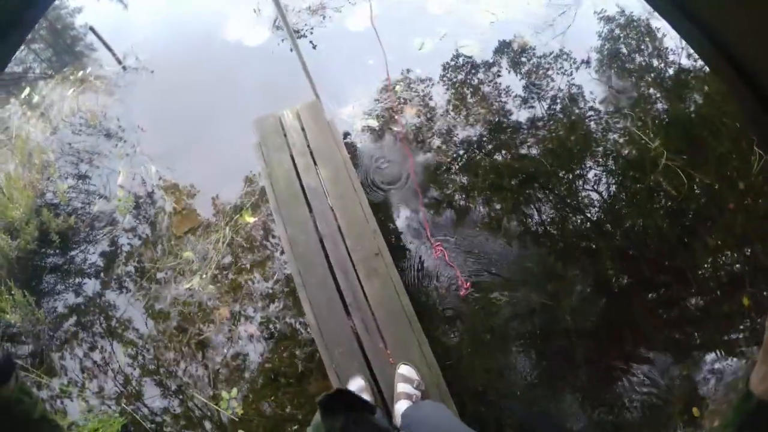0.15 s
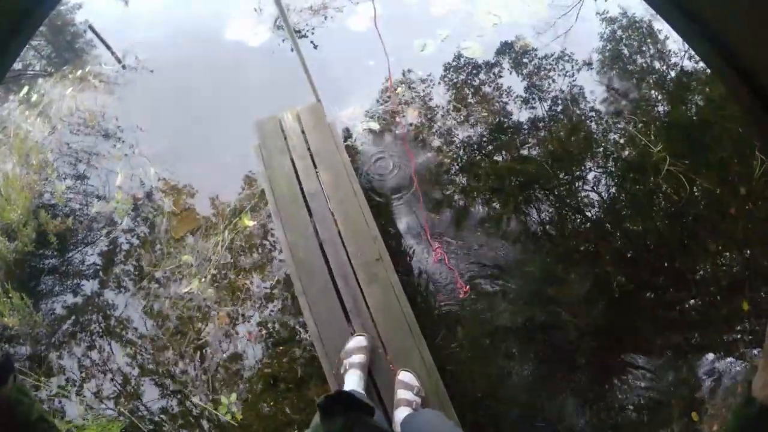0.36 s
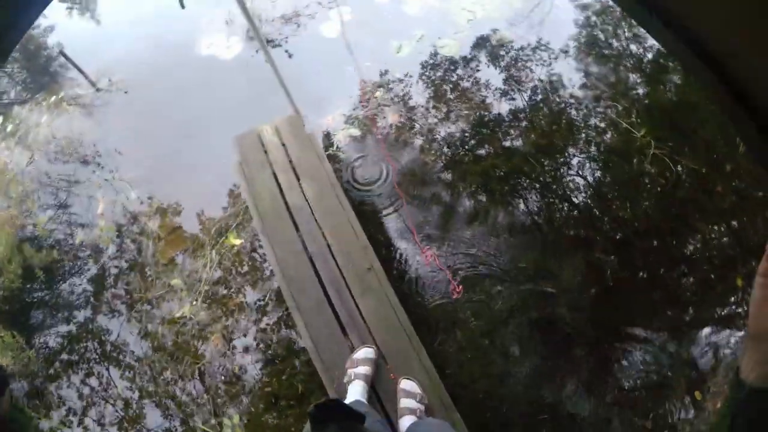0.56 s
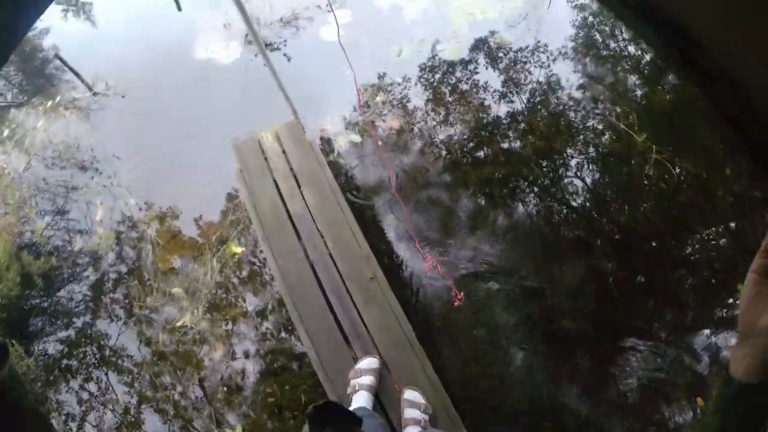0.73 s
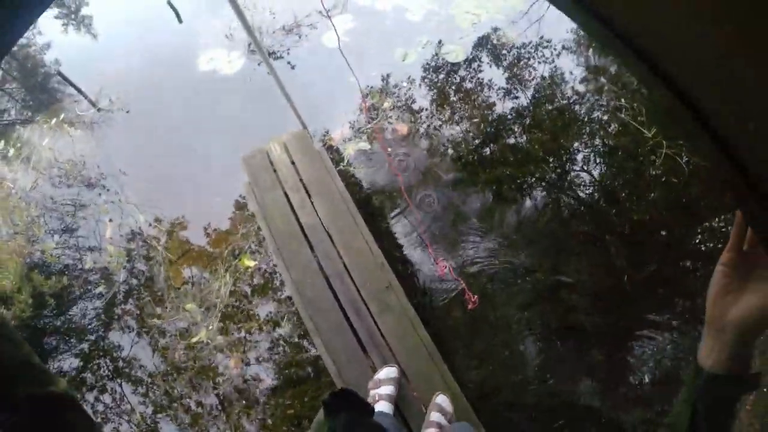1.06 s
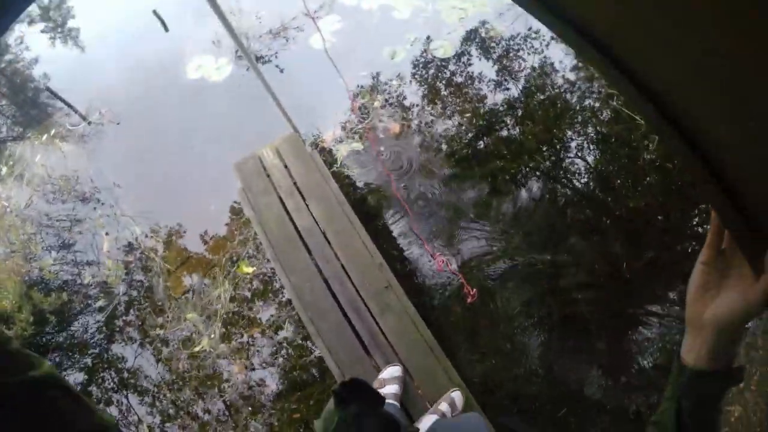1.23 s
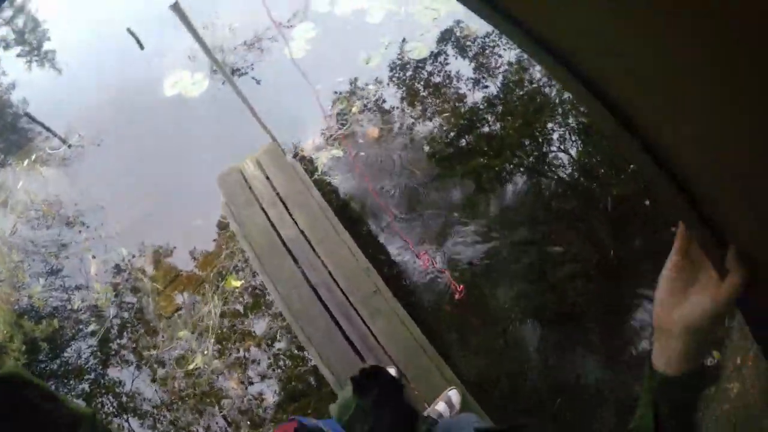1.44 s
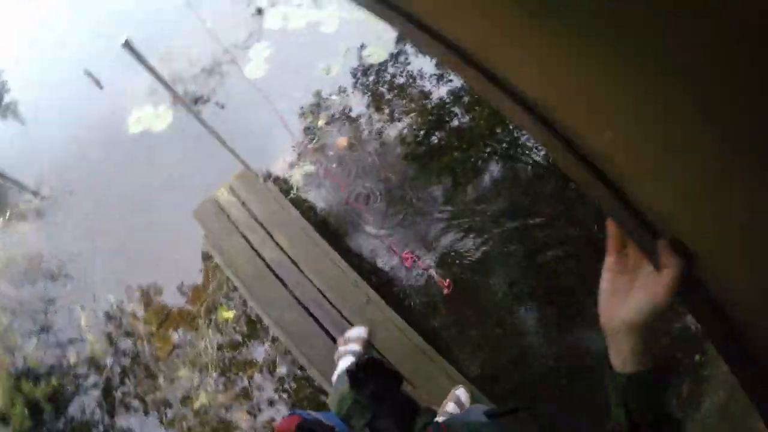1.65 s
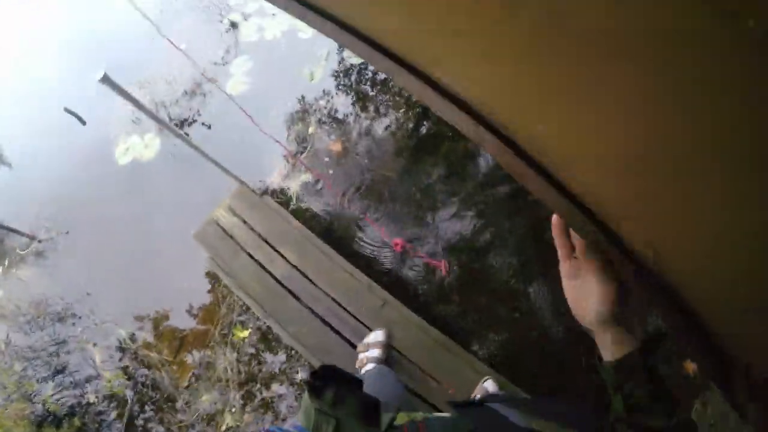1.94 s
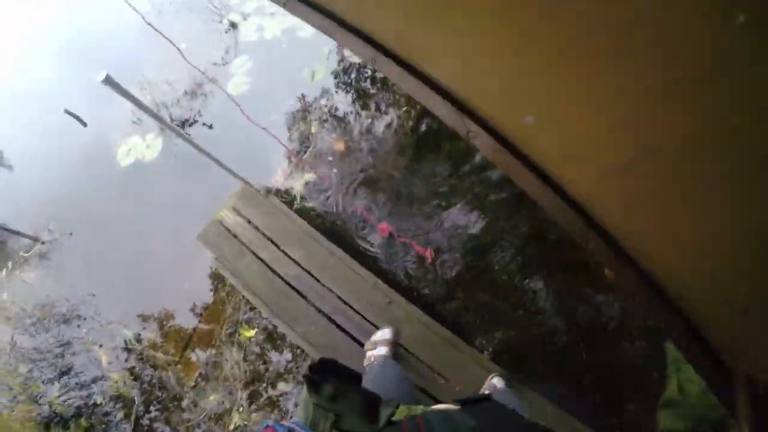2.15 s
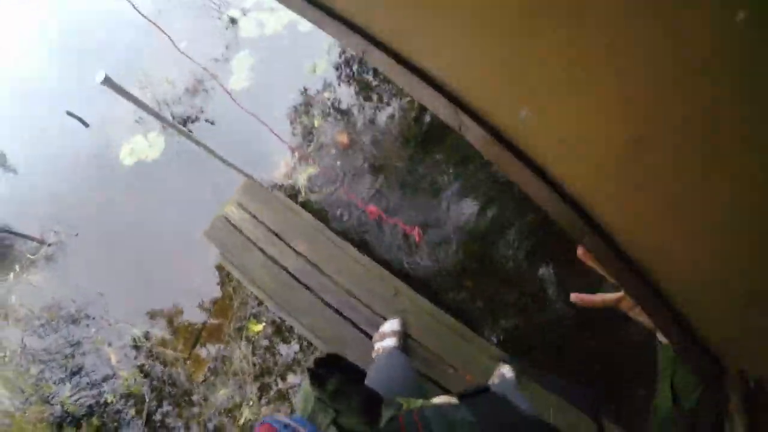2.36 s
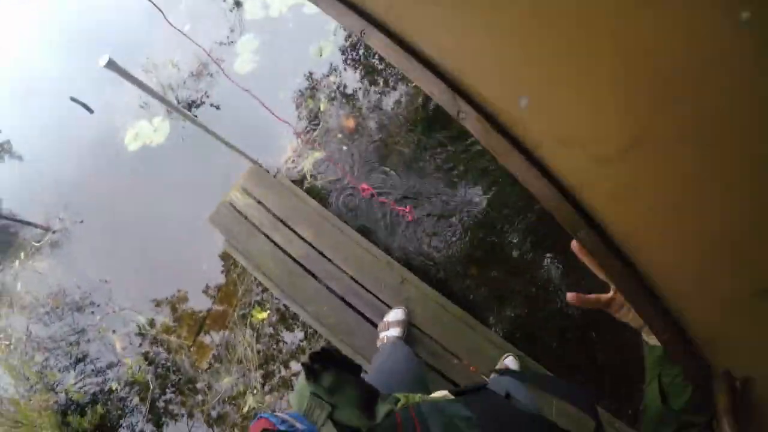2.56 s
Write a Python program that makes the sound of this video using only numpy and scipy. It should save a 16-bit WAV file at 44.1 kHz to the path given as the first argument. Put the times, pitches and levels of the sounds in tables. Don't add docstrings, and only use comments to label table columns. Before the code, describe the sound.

A boat hull booms and knocks as it is shifted, with small creaks and heavy low rumble

```python
import sys
import numpy as np
from scipy import signal
from scipy.fft import rfft, irfft
from scipy.io import wavfile
from scipy.ndimage import uniform_filter1d

SR = 44100
rng = np.random.default_rng(int(sys.argv[2]) if len(sys.argv) > 2 else 0)


def transcribe(u):
    v = np.clip(np.atleast_2d(u).T, -1, 1)
    q = np.round(v * 32767).astype(np.int16)
    wavfile.write(sys.argv[1], SR, q)


def gain_from_db(level_db):
    decades = np.asarray(level_db, float) / 20
    return 10 ** decades


N = 119070
T = np.arange(N) / SR
HZ = np.fft.rfftfreq(N, 1 / SR)

# (time [s], level [dB])
SHAKE_LEVEL = [(0, -32.5), (.17, -23), (.3, -31), (.5, -19.5), (.6, -25.5), (.85, -23), (1.15, -24.5),
               (1.45, -19.5), (1.54, -29), (1.6, -15.5), (1.72, -16), (1.88, -14), (1.98, -25), (2.13, -15),
               (2.28, -23), (2.4, -25.5), (2.52, -15.5), (2.65, -29)]
# (time [s], level [dB])
LOAD_LEVEL = [(0, -35), (.3, -45), (.55, -40), (.7, -28.5), (1.1, -26.5), (1.2, -31), (1.35, -23),
              (1.52, -24.5), (1.56, -31), (1.9, -36), (2.08, -21), (2.2, -31), (2.245, -27), (2.33, -16),
              (2.39, -31.5), (2.47, -26.5), (2.58, -41.5), (2.67, -37.5)]
# (frequency [Hz], level [dB], t60 [s])
HULL_MODES = [(79.35, -13, 0.68), (105.9, 0.5, 0.3), (127.1, -4.5, 0.49), (163, -3, 0.23),
              (184.6, -3.5, 0.2), (210, -8, 0.098), (235.5, -5.5, 0.14), (261, -10.5, 0.15),
              (308.6, -15, 0.2), (393, -14, 0.13), (453.3, -26.5, 0.099), (520, -30, 0.33),
              (639, -28.5, 0.2), (697, -33, 0.078), (780, -40, 0.07)]
# (frequency [Hz], density [dB per Hz])
AIR_SPECTRUM = [(60, -6), (200, -15), (500, -17.5), (900, -16), (2000, -28), (5000, -38), (7000, -86),
                (14800, -39)]
# (time [s], level [dB])
RUSTLE_LEVEL = [(0, -59), (.1, -60.5), (.4, -59), (.65, -54.5), (1.1, -56), (1.25, -54), (1.4, -53),
                (1.6, -48.5), (1.8, -52), (1.9, -50.5), (2.07, -47), (2.2, -51), (2.4, -54), (2.55, -58),
                (2.7, -56.5)]
# (frequency [Hz], density [dB per Hz])
CLOTH_SPECTRUM = [(300, -2.5), (1000, -4), (2500, -9), (5000, -13.5), (6600, -5), (8500, -9.5),
                  (11000, -15), (14800, -21)]
# (time [s], length [s], level [dB], brightness [dB per octave])
CLOTH_SCUFFS = [(.008, 0.065, -60, 7), (0.466, 0.017, -45, -3), (0.714, .16, -42, -10),
                (1.042, 0.02, -29, -8), (1.271, 0.046, -41, -1), (1.291, 0.027, -32.5, -3.5),
                (1.413, 0.0048, -46, -1), (1.449, 0.025, -43.5, 2.5), (1.672, 0.023, -46.5, 1),
                (2.027, 0.07, -36.5, -6.5), (2.246, 0.042, -40.5, -0.5), (2.324, 0.032, -46, 4),
                (2.641, 0.023, -42.5, 1.9)]
# (time [s], level [dB], centre [Hz])
CLOTH_SNAPS = [(.0075, -30.5, 6850), (0.0133, -44, 6700), (0.0186, -27, 6960), (.0225, -43, 6500),
               (.032, -35, 7950), (.063, -42, 4970), (0.1632, -44, 8200), (0.252, -47, 6960),
               (.2892, -40, 7400), (0.8103, -31.5, 6850), (1.413, -31, 6900)]
# (time [s], level [dB], brightness [dB per octave])
HULL_BLOWS = [(.036, -23.5, -20), (.44, -23.5, 9), (0.678, -31, -10), (1.043, -12, -4), (1.066, -21, -3),
              (1.3, -17, -4), (1.68, -15.5, 7), (1.931, -24, 8), (1.974, -22, -4), (2.01, -24, 9),
              (2.065, -11, 8), (2.085, -24, -0.5), (2.131, -32, 10), (2.247, -8.5, 11.5), (2.254, -1, 4),
              (2.266, 2, 0.3), (2.293, -3.5, 1.5), (2.324, -14.5, 6), (2.339, -5.5, 1.5),
              (2.352, -11.5, -2.5), (2.414, -15, -11), (2.49, -28, 12.5)]
# (time [s], tick level [dB], ring re tick [dB], sizzle re tick [dB])
YOKE_SLIPS = [(.436, -31.5, -14, 3.5), (0.467, -29.5, -4.5, 1.5), (.669, -35, 4, -23),
              (.723, -30.5, 1.5, -8), (.761, -31, 4, -6), (0.793, -32.5, 5.5, -5), (.819, -32.5, 6.5, -15),
              (0.836, -35, 5, -5), (0.857, -31, 5, -16), (.887, -36.5, 9.5, -14), (.932, -45, 3, -13),
              (0.991, -38, 6.5, -5), (1.0407, -19, -13, -6.5), (1.046, -34, -7, -27),
              (1.052, -29.5, -3, -14), (1.0615, -35, -7, -20), (1.071, -36, -14, -22),
              (1.277, -34.5, -0.5, -15), (1.297, -28, -5.5, -22), (1.316, -40, -4, -12),
              (1.346, -33.5, 2, -20), (1.684, -35.5, -1.5, -4), (1.899, -34, -5.5, -25),
              (1.977, -34.5, -5, -19), (2.0, -32, -5, -8), (2.2475, -42, 10.5, -10), (2.2636, -30.5, -3, 2),
              (2.362, -35, -6.5, -20), (2.647, -39.5, -11, -3)]
# (frequency [Hz], level [dB], t60 [s])
TICK_MODES = [(874, -1, 0.019), (1260, 5, 0.014), (1420, -3, 0.018), (1663, 4, 0.014), (2020, -3, 0.0073),
              (2340, -1.5, 0.013), (2770, -8, 0.013), (3510, -11.5, 0.018), (4350, -14, 0.0069)]
# (frequency [Hz], level [dB], t60 [s])
YOKE_MODES = [(455.4, 1.5, 0.067), (536.5, -4, 0.055), (615, -3.5, 0.065), (696.5, -11, 0.066),
              (763, -6, 0.051), (883, -8, 0.09), (981, -10, 0.056), (1167, -11.5, 0.031)]
# (time [s], level [dB])
HUM_LEVEL = [
    (.6, -83),
    (.76, -36.5),
    (.9, -23.5),
    (1.11, -34),
    (1.18, -43),
    (1.36, -44),
    (1.5, -33),
    (1.56, -48),
]
# (time [s], level [dB], pitch [Hz])
GROAN_TRACK = [
    (1.2, -51.5, 460),
    (1.29, -38, 433),
    (1.36, -37.5, 478.4),
    (1.391, -47, 475.2),
    (1.41, -37.5, 446),
    (1.47, -39, 449),
    (1.53, -42.5, 459),
    (1.55, -53, 463),
    (1.6, -38, 470),
]
# (time [s], length [s], level [dB], pitch [Hz])
PANEL_PINGS = [
    (1.298, 0.038, -29, 564),
    (1.563, 0.049, -30, 249.6),
    (2.006, 0.026, -37.5, 750),
]
# (frequency [Hz], left over right [dB])
PORT_BALANCE = [(70, 3), (200, 1.5), (600, 1.5), (1400, -3), (3000, -2.7), (5500, 4.5), (9000, -5),
                (14000, 0)]
# (frequency [Hz], left lead [rad])
PORT_PHASE = [(120, -0.2), (330, -.45), (780, -2), (1380, -1.82), (1890, -1.2), (4050, -0.34), (7670, -4),
              (12000, -3.5)]
# (frequency [Hz], left-right correlation [0..1])
PORT_LIKENESS = [(150, 0.98), (350, 0.83), (600, 0.61), (2000, 0.57), (8000, 0.27)]


def evened(x):
    return x / np.sqrt(np.mean(x ** 2) + 1e-20)


def smoothed(x, samples):
    return uniform_filter1d(uniform_filter1d(x, samples), samples)


def read(points, hz):
    f, value = np.transpose(points)
    return np.interp(np.log(hz + 1), np.log(f + 1), value)


def level(curve):
    s, db = np.transpose(curve)
    return gain_from_db(np.interp(T, s, db))


def add(mix, s, sound):
    part = mix[max(round(s * SR), 0):][:len(sound)]
    part += sound[:len(part)]


def flicker(per_s, db):
    return gain_from_db(db * evened(smoothed(rng.standard_normal(N), int(SR / per_s))))


def tone(hz):
    return np.sqrt(2) * np.sin(2 * np.pi * np.cumsum(hz) / SR)


def coloured(spectrum_db, x):
    return evened(irfft(rfft(x) * gain_from_db(spectrum_db), N))


def resonate(x, hz, width_hz):
    r = np.exp(-np.pi * width_hz / SR)
    pole = r * np.exp(2j * np.pi * hz / SR)
    return 2 * signal.lfilter([1 - r], [1, -pole], x, axis=-1).real


def body(modes, detune=0, bright_db=0):
    t = T[:SR // 3]
    ring = np.zeros(len(t))
    for hz, db, t60 in modes:
        decay = gain_from_db(db + bright_db * np.log2(hz / 200) - 60 * t / t60)
        mode_hz = hz * (1 + detune * rng.standard_normal())
        ring += decay * np.sin(2 * np.pi * mode_hz * t)
    return ring / abs(ring).max()


def bloom(modes, rise_s, spread):
    t = T[:SR // 6]
    ring = np.zeros(len(t))
    for hz, db, t60 in modes:
        level_draw, pitch_draw, phase_draw = rng.standard_normal(3)
        decay = gain_from_db(db + 2.04 * level_draw - 60 * np.maximum(t - rise_s, 0) / t60)
        ring += decay * np.sin(2 * np.pi * hz * (1 + spread * pitch_draw) * t + 9 * phase_draw)
    ring *= 1 - np.exp(-(t / rise_s) ** 3 * 1.7)
    return ring / abs(ring).max()


def shake():
    centre_hz, width_hz, pan_db, same = 31.2, 41, -13.5, 0.81
    lumps = resonate(rng.standard_normal((2, N)), centre_hz, width_hz)
    lumps = resonate(lumps, centre_hz, width_hz * 2.65)
    lumps = lumps / smoothed(abs(lumps), SR // 14)
    a, b = irfft(rfft(lumps) / (1 + (HZ / 50) ** 6), N)
    left = same * a + np.sqrt(1 - same ** 2) * b
    pair = np.array([left * gain_from_db(pan_db / 2), a * gain_from_db(-pan_db / 2)])
    return pair / np.sqrt(np.mean(pair.mean(axis=0) ** 2)) * level(SHAKE_LEVEL)


def hull_rub():
    friction = rng.standard_normal(N) * flicker(35.5, 4.1)
    rub = signal.oaconvolve(friction, body(HULL_MODES, bright_db=-10))[:N]
    rub = rub / smoothed(abs(rub), SR // 20)
    return evened(rub) * level(LOAD_LEVEL)


def air():
    hiss = rng.standard_normal(N) * flicker(36, 1)
    return gain_from_db(-46) * coloured(read(AIR_SPECTRUM, HZ), hiss)


def jacket():
    grains_per_s, spread_db, grain_db, grain_s = 900, 5, -5, 0.00091
    size = gain_from_db(spread_db * np.minimum(rng.exponential(1, N), 3.5))
    grains = size * (rng.random(N) < grains_per_s / SR)
    grains = np.convolve(grains, np.exp(-T[:200] / grain_s))[:N] * rng.standard_normal(N)
    raw = rng.standard_normal(N) + gain_from_db(grain_db) * evened(grains)
    cloth_db = read(CLOTH_SPECTRUM, HZ)
    out = gain_from_db(7) * coloured(cloth_db, raw * flicker(35, 1.5)) * level(RUSTLE_LEVEL)
    octaves = np.log2(np.clip(HZ, 500, 8000) / 3000)
    for s, length_s, db, bright_db in CLOTH_SCUFFS:
        scuff = coloured(cloth_db + bright_db * octaves, raw)
        u = (T - s) / length_s
        out += gain_from_db(db) * scuff * np.clip(u / 0.038, 0, 1) * np.exp(-np.maximum(u, 0) ** 3.4)
    return out


def cloth_snaps():
    decay_s, width_hz = 0.0015, 2200
    out, t = np.zeros(N), T[:400]
    for s, db, hz in CLOTH_SNAPS:
        burst = rng.standard_normal(len(t)) * np.exp(-t / decay_s)
        crack = resonate(resonate(burst, hz, width_hz), hz, width_hz)
        add(out, s, gain_from_db(db + 3) * crack / abs(crack).max())
    return out


def hull_blows():
    rise_s = 0.0014
    out = np.zeros(N)
    for s, db, bright_db in HULL_BLOWS:
        ring = body(HULL_MODES, 0.0347, bright_db)
        add(out, s, gain_from_db(db) * ring * (1 - np.exp(-T[:len(ring)] / rise_s)))
    return out


def yoke_slips():
    tick_rise_s, ring_rise_s, sizzle_decay_s = 0.001, 0.0095, 0.0012
    out, t = np.zeros(N), T[:1500]
    for s, tick_db, ring_db, sizzle_db in YOKE_SLIPS:
        tick = bloom(TICK_MODES, tick_rise_s, 0.035)[:len(t)]
        sizzle = resonate(resonate(rng.standard_normal(len(t)), 7700, 2600), 7800, 2800)
        sizzle *= np.exp(-t / sizzle_decay_s)
        sizzle /= abs(sizzle).max()
        ring = bloom(YOKE_MODES, ring_rise_s, 0.011)
        add(out, s, gain_from_db(tick_db + 3) * (tick + gain_from_db(sizzle_db - 3) * sizzle))
        add(out, s, gain_from_db(tick_db + ring_db + 5) * ring)
    return out


def hull_hum():
    hum_hz, waver = 103.47, 0.0354
    pitch_hz = hum_hz * flicker(25, 1) ** (8.7 * waver)
    return tone(pitch_hz) * flicker(20, 1.8) * level(HUM_LEVEL)


def yoke_groan():
    slips_per_s, throb_db, grit_db, fade_s = 55, 2.5, -0.5, 0.0087
    s, db, hz = np.transpose(GROAN_TRACK)
    slip_count = np.floor(np.cumsum(slips_per_s * flicker(29.88, 3)) / SR)
    slips = np.diff(slip_count, prepend=0) * flicker(60, 1.8)
    line = tone(np.interp(T, s, hz) * flicker(59, 0.1245)) * flicker(45, throb_db)
    grit = evened(signal.oaconvolve(slips, body(YOKE_MODES))[:N])
    span = np.clip(np.minimum(T - s[0], s[-1] - T) / fade_s, 0, 1)
    return (line + gain_from_db(grit_db) * grit) * gain_from_db(np.interp(T, s, db)) * span


def panel_pings():
    out = np.zeros(N)
    for s, length_s, db, hz in PANEL_PINGS:
        t = T[:int(length_s * SR)]
        swell = np.sin(np.pi * t / length_s) ** 0.84
        add(out, s, gain_from_db(db) * swell * np.sin(2 * np.pi * hz * t))
    return out


def under_hull():
    hull = hull_rub() + hull_blows() + hull_hum() + panel_pings()
    yoke = yoke_slips() + yoke_groan()
    return hull + yoke + jacket() + cloth_snaps() + air()


def ports(x, other):
    same = np.clip(read(PORT_LIKENESS, HZ), 0, 1)
    half = gain_from_db(read(PORT_BALANCE, HZ) / 2) * np.exp(0.5j * read(PORT_PHASE, HZ))
    common = np.sqrt((1 + same) / 2) * rfft(x)
    unlike = np.sqrt((1 - same) / 2) * rfft(other)
    return irfft(np.array([(common + unlike) * half, (common - unlike) / half]), N)


def scene():
    return shake() + ports(under_hull(), under_hull())


def low_pass(x):
    return signal.sosfilt(signal.butter(12, 14920, fs=SR, output="sos"), x)


def record(dry):
    mic_top_hz = 10300
    dull = irfft(rfft(dry) / np.sqrt(1 + (HZ / mic_top_hz) ** 8), N)
    mix = np.tanh(dull)
    return low_pass(mix)


dry = scene()
out = record(dry)
transcribe(out)
```